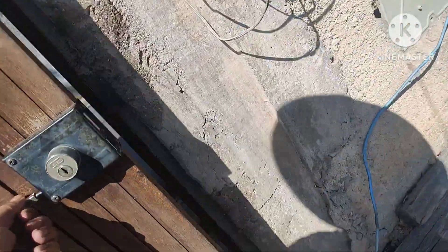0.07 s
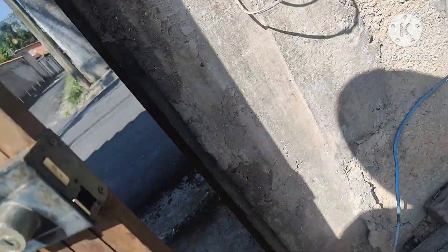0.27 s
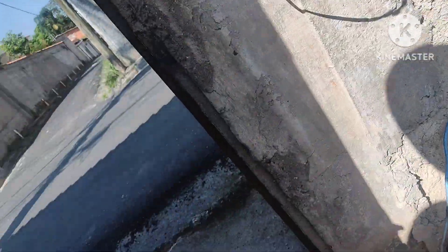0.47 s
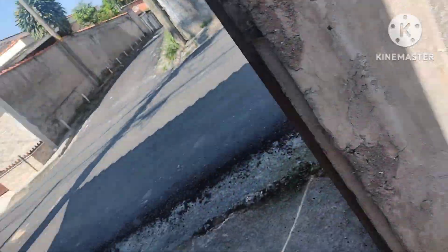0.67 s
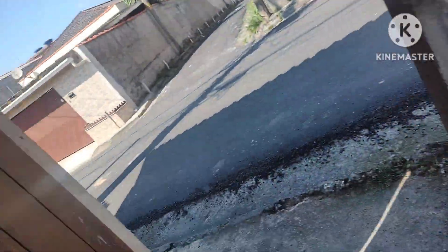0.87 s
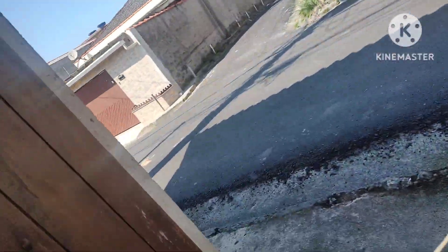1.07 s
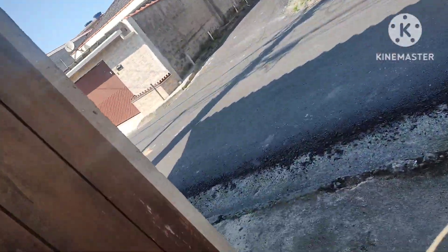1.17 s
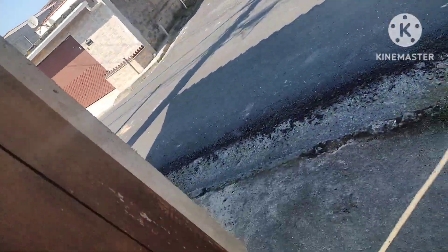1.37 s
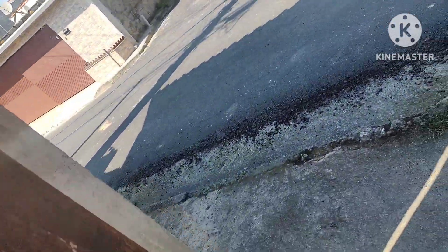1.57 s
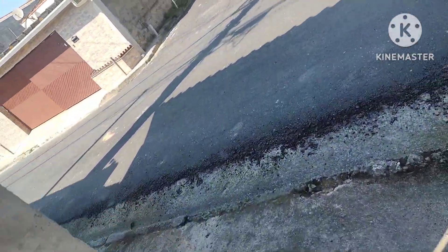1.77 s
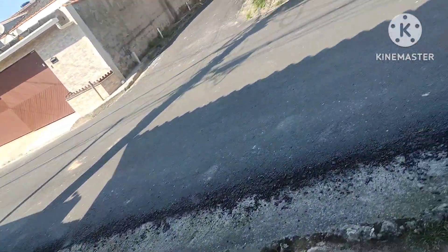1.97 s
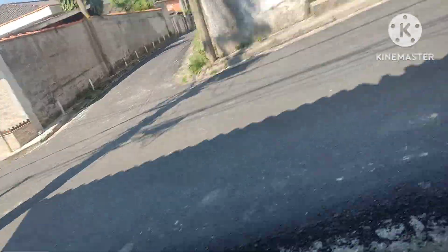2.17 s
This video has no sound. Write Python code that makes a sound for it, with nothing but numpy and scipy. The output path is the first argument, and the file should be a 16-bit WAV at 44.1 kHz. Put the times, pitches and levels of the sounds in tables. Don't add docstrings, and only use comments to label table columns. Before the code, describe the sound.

A wooden gate opens beside a quiet street, heard close on a phone. Small lock ticks at 0.04-0.2 s, a loud bright metal clack at 0.49, a lesser one at 0.66. Low wind thumps cluster from 0.6 to 1.2. The hinge squeals thinly from 0.95, stronger and sinking from 1.07, groans at 1.33, creaks until 1.5 over a grainy hiss. The latch rattles rapidly from 2.1; faint street hum beneath.

```python
import sys
import numpy as np
from scipy import signal
from scipy.fft import rfft, irfft, next_fast_len
from scipy.io import wavfile
from scipy.ndimage import uniform_filter1d

SR = 44100
rng = np.random.default_rng(int(sys.argv[2]) if len(sys.argv) > 2 else 0)


def undo_db(level):
    steps = np.asarray(level, float) / 20
    return 10 ** steps


def to_wav(s):
    ch = np.atleast_2d(s).T
    pcm = np.round(np.clip(ch, -1, 1) * 32767)
    wavfile.write(sys.argv[1], SR, pcm.astype(np.int16))


N = 97990
T = np.arange(N) / SR

# (frequency [Hz], level [dB per Hz])
STREET_SPECTRUM = [(18, -60), (30, -42), (114, 0.5), (279, -6.5), (775, -28), (2200, -28), (6000, -41),
                   (15800, -47.5)]
# (frequency [Hz], likeness [0-1])
PORT_LIKENESS = [(60, 1), (950, 0.5), (15000, 0.087)]
# (time [s], level [dB])
DRONE_LEVEL = [(0, -72.5), (1.0, -52), (1.6, -42), (1.75, -49.5), (2.22, -46)]
# (frequency [Hz], width [Hz], level [dB])
DRONE_PEAKS = [(185, 7.2, 6), (279, 2.8, -4), (444.4, 99, -11)]
# (time [s], left level [dB], right level [dB])
GUST_LEVEL = [(0, -72, -52.5), (.35, -56.5, -68), (.6, -44, -53), (.85, -39, -62.5), (.95, -45, -38),
              (1.03, -37.5, -29.5), (1.1, -42, -42), (1.5, -44, -55), (2.22, -54.5, -54)]
# (frequency [Hz], level [dB])
WIND_SPECTRUM = [(25, -47), (50, -11.5), (100, -2), (220, -13), (600, -52), (2000, -119.5)]
# (time [s], peak level [dB], swing frequency [Hz])
WIND_THUMPS = [(0.344, -28, 98), (1.38, -40, 104), (0.583, -25.5, 116), (0.631, -19, 123),
               (0.68, -15.5, 116), (.709, -18, 122), (0.793, -37, 92), (0.808, -42, 91), (0.823, -24, 135),
               (0.839, -18.5, 97), (0.857, -27.5, 147), (0.927, -24.5, 132), (.94, -29, 93),
               (.962, -24.5, 157), (0.979, -19.5, 92), (.997, -25.5, 137), (1.037, -25.5, 111),
               (1.082, -33, 100), (1.159, -27.5, 97), (1.197, -22, 130)]
# (time [s], peak level [dB], ring frequency [Hz], crack over ring [dB])
LOCK_CLICKS = [(0.039, -49, 1920, 5), (0.1057, -35, 1600, -12), (0.1148, -39.5, 1690, -5.5),
               (0.131, -52, 1900, 2), (0.141, -44, 3130, 6.5), (0.171, -36, 3760, -14),
               (0.185, -43, 3200, -20), (0.4135, -35.5, 3670, 7), (0.474, -30, 3240, -16),
               (0.4886, -27.5, 5250, 11), (0.4881, -8, 3110, -4.5), (0.4913, -20, 2050, -10),
               (0.4977, -25, 1430, -15), (.072, -42, 2000, -15), (0.649, -36, 5160, -3.5),
               (0.6515, -33.5, 2070, 5.5), (0.6627, -19.5, 1550, -10), (0.6646, -21, 3380, -12),
               (0.668, -29.5, 3770, -6), (.674, -42, 1550, -16), (2.067, -36, 2600, -12),
               (2.069, -39.5, 2700, 6), (2.1, -36.5, 4300, -2)]
# (frequency [Hz], level [dB per Hz])
CRACK_SPECTRUM = [(1500, -8), (3000, -4.5), (6000, 6), (10000, -0.5), (15500, -24)]
# (frequency [Hz], level [dB per Hz])
POST_SPECTRUM = [(300, -8.5), (1000, 3), (2100, 5), (3500, -7.5), (8000, -32)]
# (frequency [Hz], level [dB], decay to -60 dB [s])
CASE_MODES = [(5362, 3, .25), (5911, -2, .25)]
# (time [s], level [dB])
PIN_LEVEL = [(.12, -75), (.135, -46), (.147, -35.5), (.16, -40.5), (.178, -53.5), (.2, -61), (.23, -62),
             (.242, -89), (.36, -82)]
# (time [s], pitch [Hz], level [dB], octave level [dB],
# left over right [dB], octave left over right [dB])
SQUEAL_STEPS = [
    [(.92, 2443, -70, -100, -12, -9), (.955, 2575, -61.5, -103, -32, 5), (.972, 2529, -37, -41.5, -14, 1),
     (1.03, 2532, -31, -41, 1, 18), (1.058, 2511, -33, -29, -7, -4), (1.071, 2437, -40, -45.5, -29, 31)],
    [(1.069, 2330, -24, -47.5, 1, -27), (1.11, 2298, -29, -37, 11.5, 11), (1.21, 2268, -37, -28, 8, -2.5),
     (1.283, 2187, -31, -49, 0, -1)],
    [(1.28, 2199, -33.5, -31, -7, 25.5), (1.292, 2053, -24.5, -33.5, -1, -23.5),
     (1.32, 1999, -23, -20, -9, 4.5), (1.328, 2090, -52, -38, -5, -21)],
]
# (third, fourth, fifth, sixth partial under the octave [dB])
SQUEAL_UPPER = [
    (-26, -44, -52, -54),
    (-12, -29, -27, -24),
    (-12, -30, -36, -38),
]
# (time [s], level [dB])
RUB_LEVEL = [(.94, -83), (.985, -48), (1.15, -43.5), (1.3, -44.5), (1.48, -42.5), (1.52, -49),
             (1.75, -57.5), (1.8, -55.5), (1.88, -55.5), (1.92, -66.5), (2.22, -63)]
# (frequency [Hz], level [dB per Hz])
RUB_SPECTRUM = [(500, -11), (1150, -13.5), (1600, -1.5), (2600, -6), (4000, -15), (7000, -18),
                (10900, -20.5), (15500, -27.5)]
# (time [s], level [dB])
GROAN_LEVEL = [(1.318, -36), (1.33, -21), (1.37, -23), (1.39, -26.5), (1.4, -30), (1.412, -26.5)]
# (time [s], rate [slips per s])
GROAN_SLIP_RATE = [(1.31, 175), (1.335, 173.6), (1.35, 172.5), (1.365, 171.2), (1.385, 170.3), (1.4, 171),
                   (1.42, 176)]
# (left level [dB], right level [dB])
HINGE_PARTIALS = [(-10, -14), (-17, -15), (-24, -24), (-16, -17), (-16, -9), (-12, -12), (-16, -10),
                  (-3, 4), (3, 7), (-8, -10), (-4, -10), (-2, -12), (-6, -3), (-14, -10), (-10, -20),
                  (-13, -3), (-16, -12), (-14, -6), (-13, -3), (-10, -5), (-12, -13), (-7, -10), (-11, -4),
                  (-14, -19), (-21, -18), (-21, -23), (-10, -22), (-17, -39), (-25, -35), (-19, -30),
                  (-15, -21), (-18, -30), (-23, -32), (-25, -30), (-15, -31), (-21, -38)]
# (time [s], level [dB], roughness [0-1])
CREAK_LEVEL = [(1.38, -34, 0.04), (1.395, -31, 0), (1.408, -45, 0.01), (1.422, -28, 0.11),
               (1.435, -32.5, 0.1), (1.455, -36.5, 0.25), (1.483, -38.5, 0.35), (1.492, -47.5, 0.35),
               (1.52, -82, 0.4)]
# (time [s], rate [slips per s])
CREAK_SLIP_RATE = [(1.37, 682), (1.39, 681), (1.4, 686), (1.42, 722), (1.43, 700), (1.441, 625),
                   (1.456, 590), (1.468, 550), (1.48, 485), (1.53, 465)]
# (frequency [Hz], level [dB per Hz])
PLANK_SPECTRUM = [(300, -42), (720, 1.5), (1250, -2.5), (2100, 0), (3300, 4), (4300, -0.5), (6000, -13.5),
                  (15500, -29)]
RATTLE_TIMES = [2.115, 2.123, 2.134, 2.1437, 2.159, 2.1715, 2.183, 2.1945, 2.2065, 2.22]
# (frequency [Hz], width [Hz], level [dB])
LATCH_PEAKS = [(930, 830, -1.5), (2180, 220, 7.5), (2520, 300, 0), (2710, 120, 0), (3330, 510, 1),
               (4443, 170, 2), (5200, 5200, -13.5)]
# (frequency [Hz], width [Hz], level [dB])
REBOUND_PEAKS = [(885, 95, 4), (1200, 130, 4)]
# (frequency [Hz], level [dB])
RIGHT_PORT_RESPONSE = [(4500, 0.5), (7500, -4.5), (15500, -10.5)]


def evened(x):
    return x / np.sqrt(np.mean(x ** 2) + 1e-20)


def read(points, hz):
    f, value = np.transpose(points)
    return np.interp(np.log(hz + 1), np.log(f + 1), value)


def curve(rows):
    r = np.array(rows, float)
    inside = (T > r[0, 0]) & (T < r[-1, 0])
    gate = uniform_filter1d(1. * inside, size=150)
    return [np.interp(T, r[:, 0], column) for column in r.T[1:]] + [gate]


def colour(x, points):
    log_gain = np.log(undo_db(read(points, abs(np.fft.fftfreq(4096, 1 / SR)))))
    taps = np.fft.ifft(np.exp(np.conj(signal.hilbert(log_gain)))).real[:2048]
    taps = (taps / np.linalg.norm(taps)).reshape((1,) * (x.ndim - 1) + (-1,))
    return signal.oaconvolve(x, taps)[..., :x.shape[-1]]


def resonate(x, hz, width_hz):
    turn = np.exp(2j * np.pi * np.cumsum(hz * np.ones(len(x))) / SR)
    r = np.exp(-np.pi * abs(width_hz) / SR)
    return 2 * (turn * signal.lfilter([1 - r], [1, -r], x / turn + 1e-18)).real


def body(x, peaks):
    return sum((-1) ** k * undo_db(db) * resonate(x, hz, width) for k, (hz, width, db) in enumerate(peaks))


def drift(span_s, rows=()):
    size = max(int(span_s * SR), 2)
    x = rng.standard_normal(rows + (N,))
    return evened(uniform_filter1d(uniform_filter1d(x, size), size))


def place(x, pan_db, lag_s=0.000407):
    size = next_fast_len(N + 999)
    delay = np.exp(-2j * np.pi * np.fft.rfftfreq(size, 1 / SR) * lag_s)
    late = irfft(rfft(x, size) * delay, size)[:N]
    return np.array([x * undo_db(pan_db / 2), late * undo_db(-pan_db / 2)])


def street():
    frames, hz = N // 256 + 5, np.fft.rfftfreq(1024, 1 / SR)
    a, b, c, d, patches = rng.standard_normal((frames, 513, 5)).T
    patches = uniform_filter1d(patches, size=12, axis=0)
    patches = evened(uniform_filter1d(patches, size=10, axis=1))
    same = np.clip(read(PORT_LIKENESS, hz), -1, 1)[:, None]
    left = a + 1j * b
    right = same * left + np.sqrt(1 - same ** 2) * (c + 1j * d)
    z = np.array([left, right]) * undo_db(read(STREET_SPECTRUM, hz)[:, None] + 4.46 * patches)
    wash = evened(signal.istft(z, nperseg=1024, noverlap=768)[1][:, :N])
    drone = evened(body(rng.standard_normal(N), DRONE_PEAKS)) * undo_db(curve(DRONE_LEVEL)[0])
    return undo_db(-49) * wash + place(drone, 0.98)


def wind():
    left_db, right_db, _ = curve(GUST_LEVEL)
    rumble = evened(colour(rng.standard_normal((2, N)), WIND_SPECTRUM))
    out = rumble * undo_db(np.array([left_db, right_db]) + 6.8 * drift(0.055, (2,)))
    for s, db, hz in WIND_THUMPS:
        u = (T - s) * hz
        swing = np.cos(2 * np.pi * (u * (1 - 0.089 * u) + rng.random()))
        out[0] += undo_db(db - 0.5) * np.exp(-(u / 0.86) ** 2) * swing
    return out


def lock():
    ring_t60, crack_t60, post_t60 = .018, .02, .13
    out, t = np.zeros((2, N + 9000)), np.arange(9000) / SR
    for s, db, hz, crack_db in LOCK_CLICKS:
        noise = rng.standard_normal((3, 9000))
        ring = .5 * evened(resonate(resonate(noise[0], hz, 730), hz, 700)) * undo_db(-60 * t / ring_t60)
        crack = colour(noise[1], CRACK_SPECTRUM) * undo_db(crack_db - 8.5 - 60 * t / crack_t60)
        post = colour(noise[2], POST_SPECTRUM) * undo_db(-22.5 - 60 * t / post_t60)
        post *= np.minimum(t / 0.00043, 1)
        case = sum(undo_db(-38 + mode_db - 60 * t / t60) * np.sin(2 * np.pi * f * t)
                   for f, mode_db, t60 in CASE_MODES)
        case = case * (db > -15) * (t < .078)
        click = np.array([ring + post, crack + case])
        out[:, int(s * SR):][:, :9000] += undo_db(db) * np.minimum(t / 0.0012, 1) * click
    db, gate = curve(PIN_LEVEL)
    pin = np.sqrt(2) * gate * undo_db(db) * np.sin(2 * np.pi * 9654 * T)
    return place(out[0, :N], -4) + place(out[1, :N], 1) + place(pin, -2)


def squeal():
    out = np.zeros((2, N))
    for rows, upper in zip(SQUEAL_STEPS, SQUEAL_UPPER):
        hz, db, octave_db, pan_db, octave_pan_db, gate = curve(rows)
        turns = np.cumsum(hz * (1 + 0.00071 * drift(0.011))) / SR
        levels = [db, octave_db] + [octave_db + u for u in upper]
        for k, level in enumerate(levels, 1):
            fuzz = evened(resonate(rng.standard_normal(N), k * hz, 89))
            tone = np.sqrt(2) * np.sin(2 * np.pi * (k * turns + rng.random())) + undo_db(-16) * fuzz
            flutter_db = 0.5 * np.sqrt(k - .7) * drift(0.0032)
            out += place(gate * undo_db(level + flutter_db) * tone, pan_db if k == 1 else octave_pan_db)
    return out


def rub():
    db, gate = curve(RUB_LEVEL)
    grain_db = 0.43 * drift(0.011, (2,)) + 1.57 * drift(0.059)
    grains = rng.standard_normal((2, N)) * undo_db(grain_db)
    return evened(colour(grains, RUB_SPECTRUM)) * undo_db(db) * gate


def groan():
    db, gate = curve(GROAN_LEVEL)
    rate = curve(GROAN_SLIP_RATE)[0]
    turns = np.cumsum(rate) / SR + 0.0022 * drift(0.0036)
    turns = np.array([turns, turns - 0.000635 * rate])
    ringing = 0
    for k, port_db in enumerate(HINGE_PARTIALS, 4):
        level = undo_db(np.array(port_db)[:, None] + 4.2 * drift(.012, (2,)))
        ringing = ringing + level * np.cos(2 * np.pi * (k * turns + rng.random()))
    breath = undo_db(-27) * colour(rng.standard_normal((2, N)), PLANK_SPECTRUM)
    return (evened(ringing) + breath) * undo_db(db) * gate


def slips(rate, rough, count):
    turns = np.cumsum(rate) / SR + 0.36 * rough * drift(0.0024)
    pulses = sum(np.cos(2 * np.pi * k * turns) for k in range(1, count))
    return pulses * undo_db(7.7 * rough * drift(0.0016)) / np.sqrt(count / 2)


def creak():
    db, rough, gate = curve(CREAK_LEVEL)
    knocks = slips(curve(CREAK_SLIP_RATE)[0], rough, count=20)
    return place(colour(knocks, PLANK_SPECTRUM) * undo_db(db) * gate, -4.1, 0.00066)


def rattle():
    rebound_s = 0.0068
    hit, rebound, t = np.zeros(N + 400), np.zeros(N + 900), np.arange(400) / SR
    scratch = rng.standard_normal(400)
    for s in RATTLE_TIMES:
        size = undo_db(-26.5 + 0.5 * rng.standard_normal(2))
        fresh = scratch + 0.58 * rng.standard_normal(400)
        hit[int(s * SR):][:400] += size[0] * t / 0.0028 * np.exp(-t / 0.0016) * fresh
        rebound[int((s + rebound_s) * SR)] += size[1]
    scratches = undo_db(14.5) * body(body(hit[:N], LATCH_PEAKS), LATCH_PEAKS)
    return place(scratches + undo_db(30.5) * body(rebound[:N], REBOUND_PEAKS), -2, 0.000674)


def yard(x):
    t = np.arange(8000) / SR
    sparse = rng.standard_normal((2, 8000)) * (rng.random((2, 8000)) < .06)
    taps = uniform_filter1d(sparse * undo_db(-60 * t / .1) * (t > .002), size=3)
    return signal.fftconvolve(x, taps / np.linalg.norm(taps[0]), axes=1)[:, :N]


def scene():
    background = street() + wind()
    knocks = lock() + creak() + rattle()
    tones = squeal() + groan()
    gate = knocks + undo_db(-11) * yard(knocks) + tones + undo_db(-15) * yard(tones)
    return background + gate + rub()


def low_pass(x):
    return signal.sosfilt(signal.butter(12, 15960, fs=SR, output="sos"), x)


def record(dry):
    response = undo_db(read(RIGHT_PORT_RESPONSE, np.fft.rfftfreq(N, 1 / SR)))
    right = irfft(rfft(dry[1]) * response, N)
    band_limit = signal.firwin(511, 15600, window=("kaiser", 9), fs=SR)
    mix = signal.oaconvolve(np.array([dry[0], right]), band_limit[None], "same")
    return low_pass(mix)


dry = scene()
out = record(dry)
to_wav(out)
```